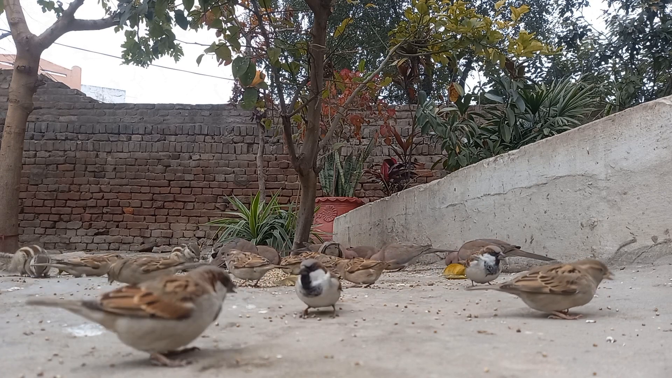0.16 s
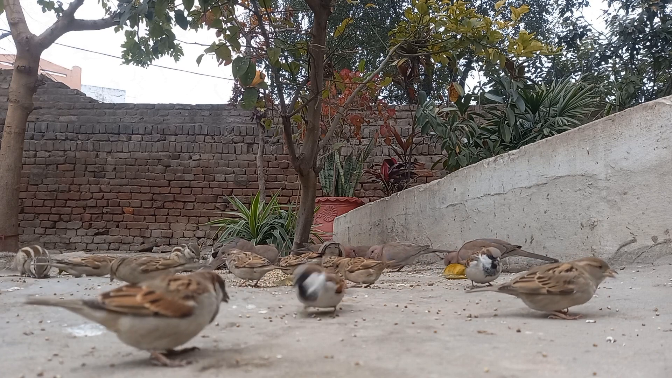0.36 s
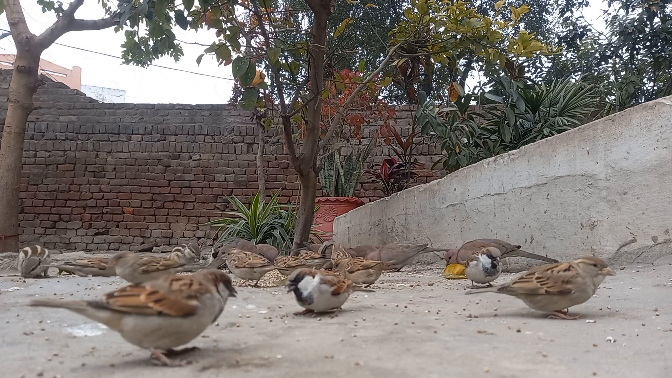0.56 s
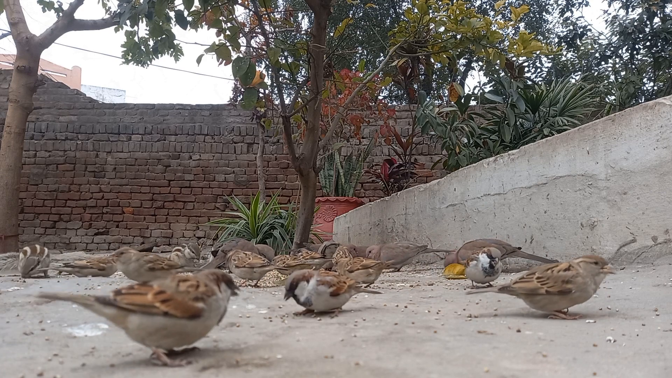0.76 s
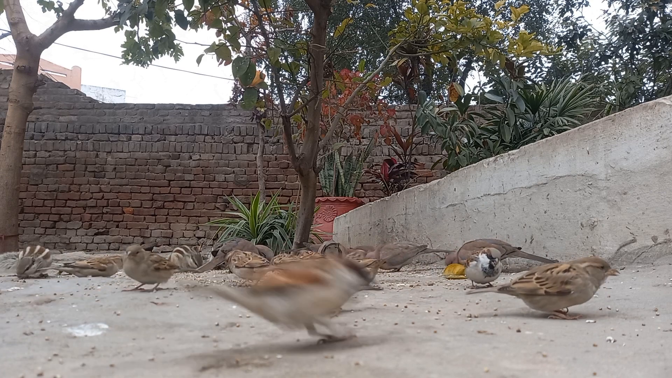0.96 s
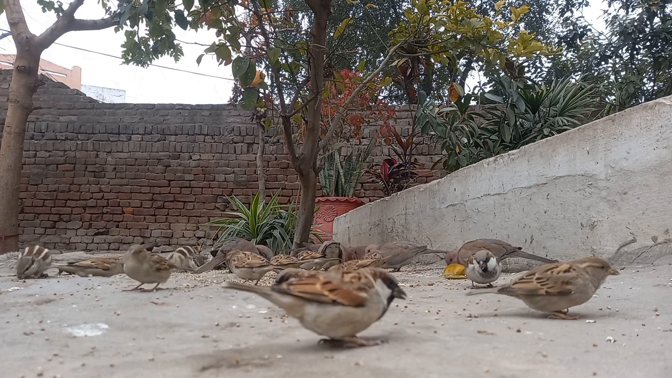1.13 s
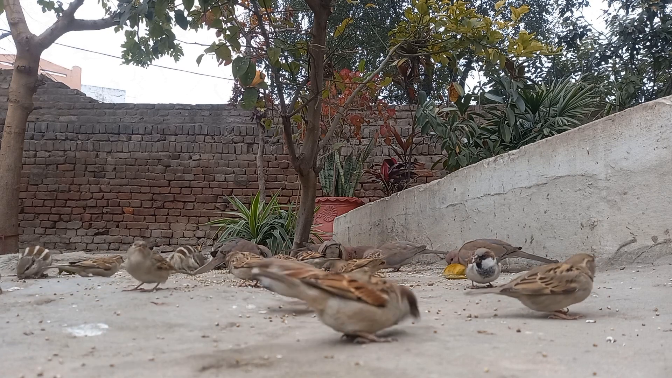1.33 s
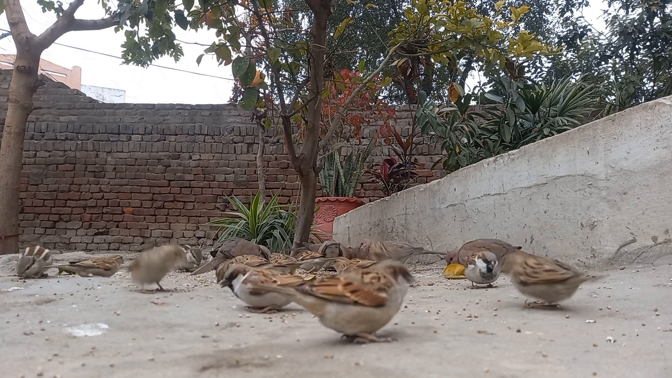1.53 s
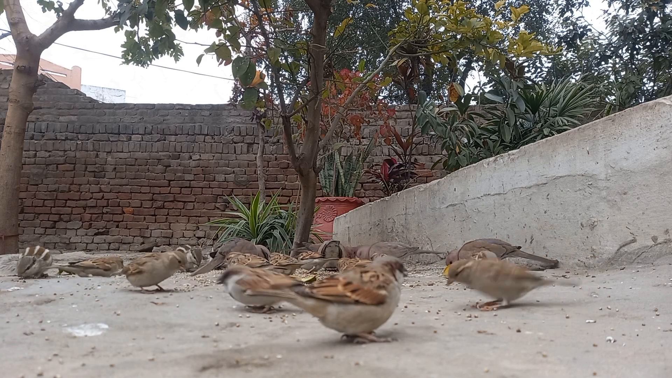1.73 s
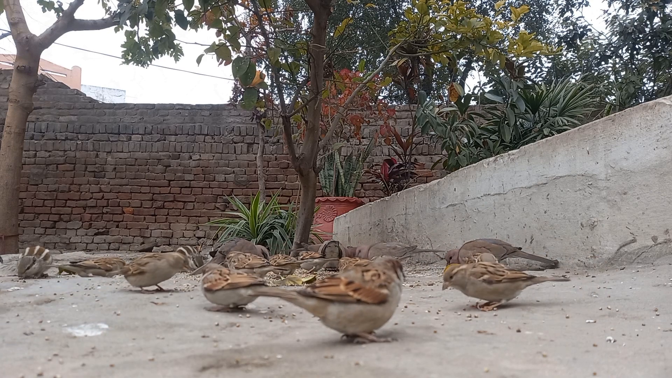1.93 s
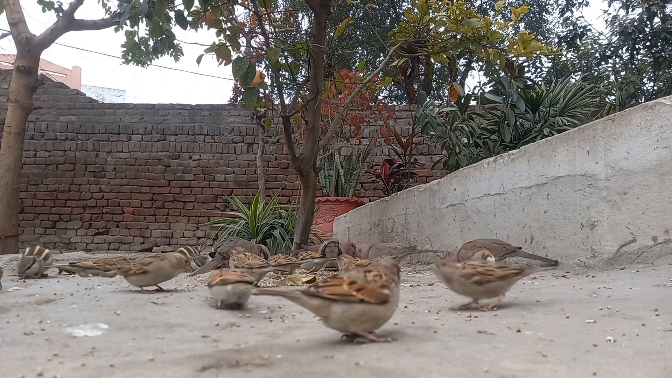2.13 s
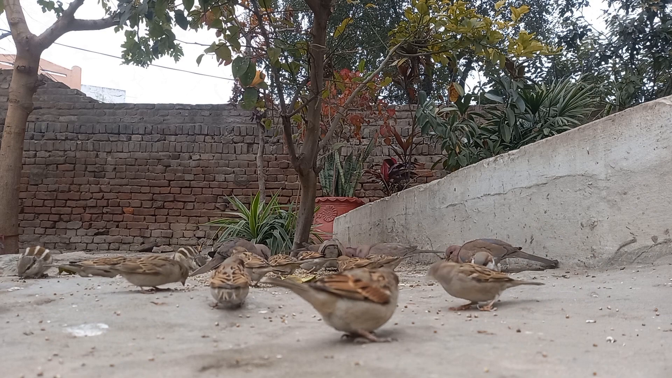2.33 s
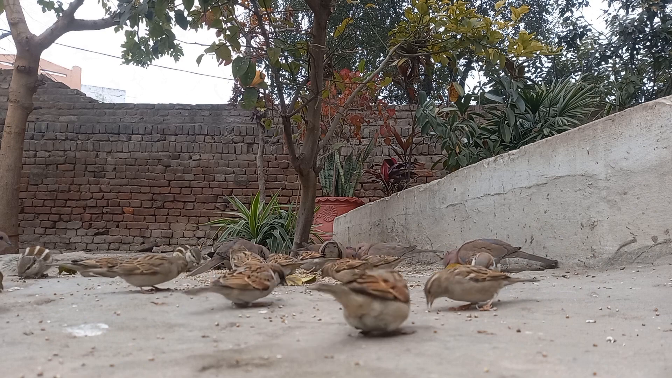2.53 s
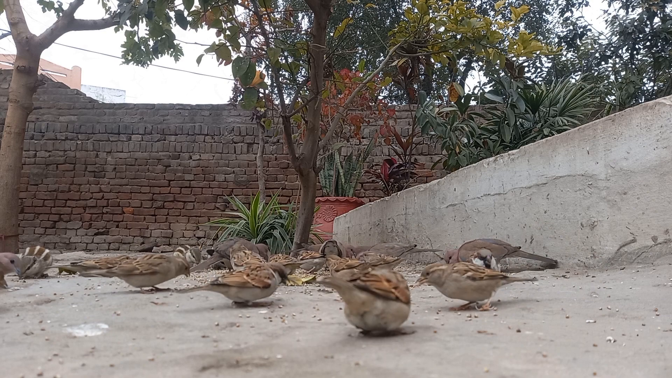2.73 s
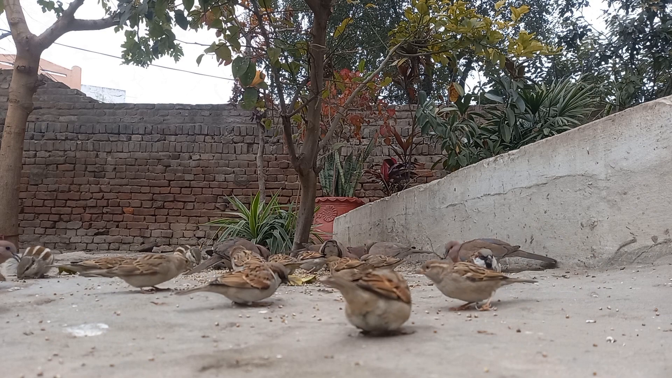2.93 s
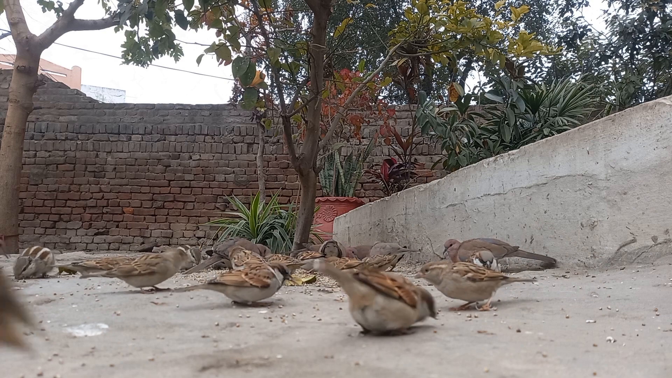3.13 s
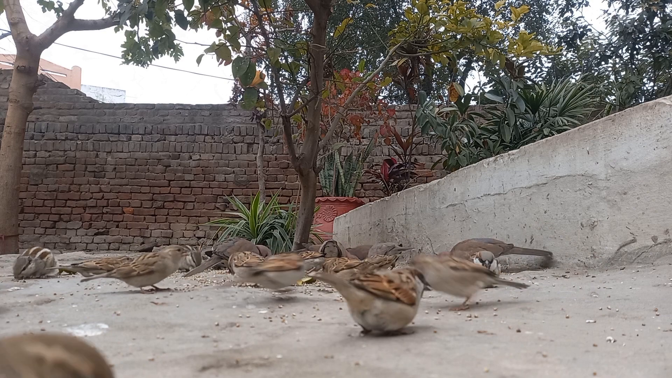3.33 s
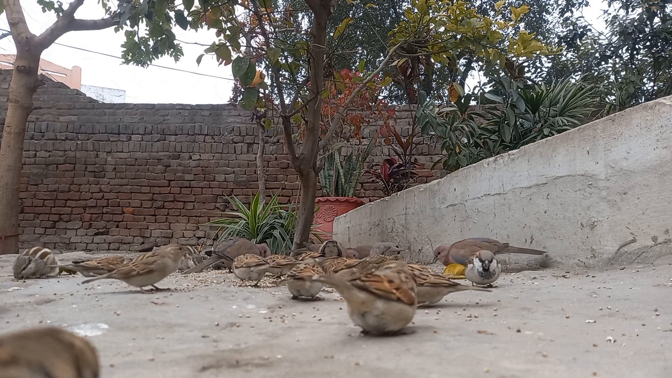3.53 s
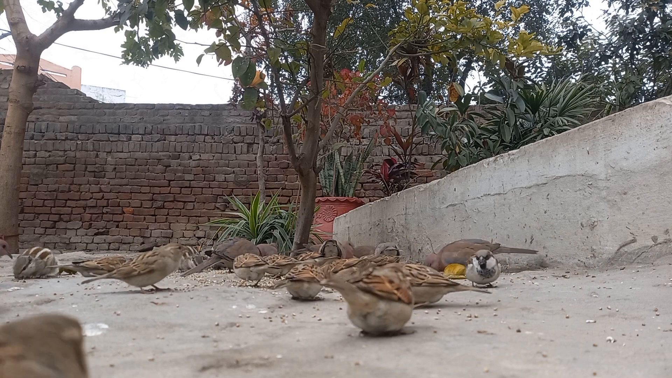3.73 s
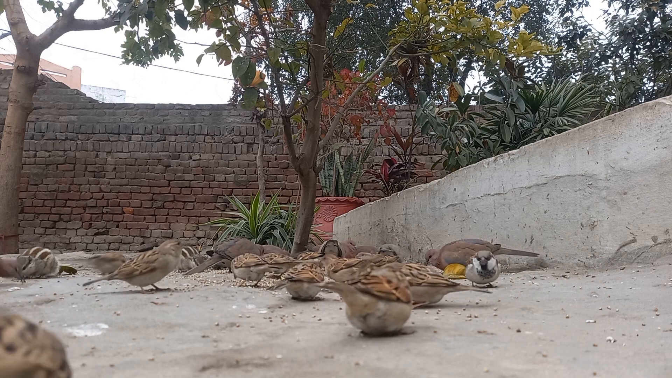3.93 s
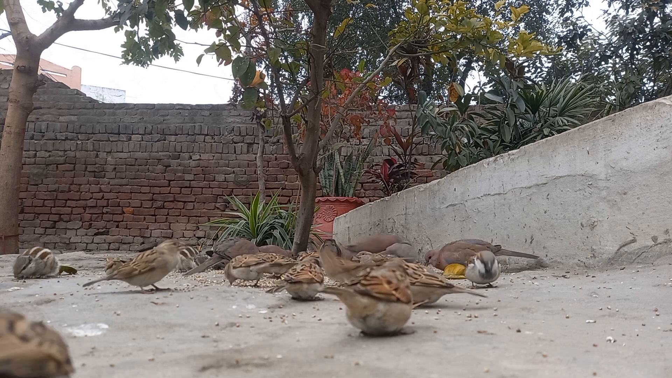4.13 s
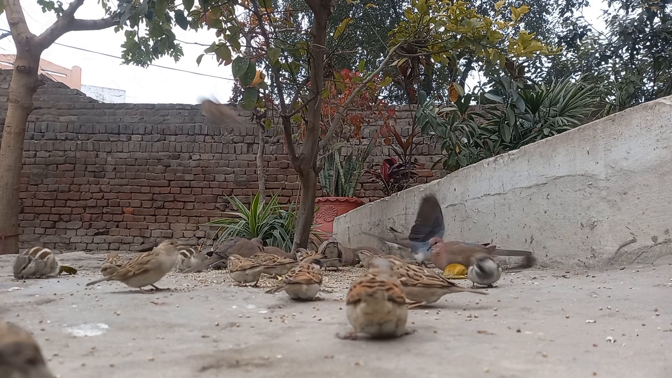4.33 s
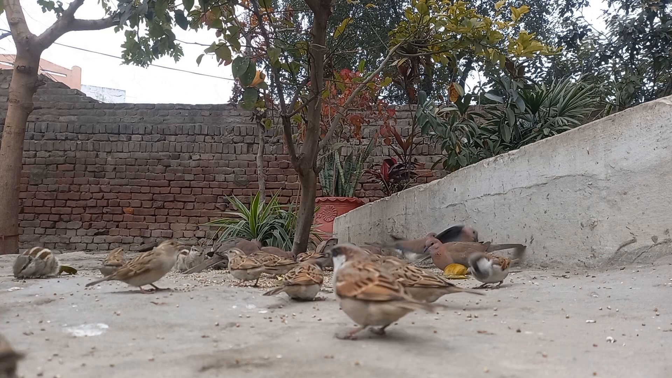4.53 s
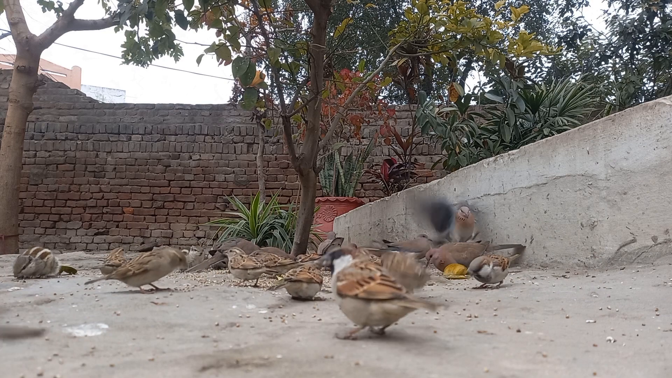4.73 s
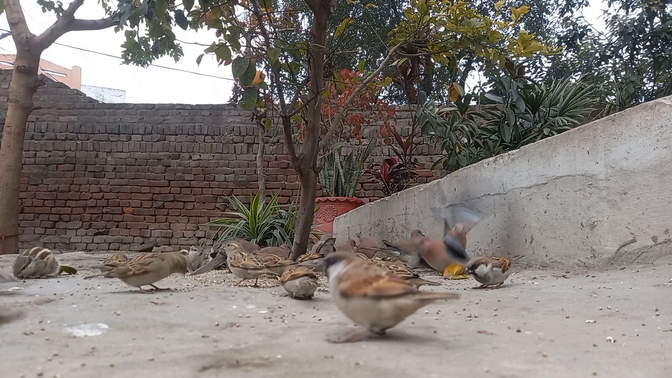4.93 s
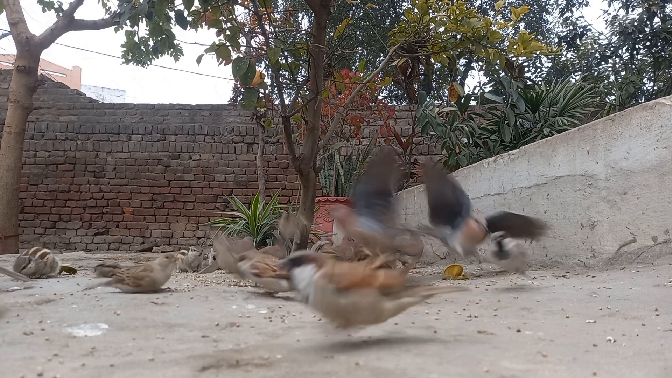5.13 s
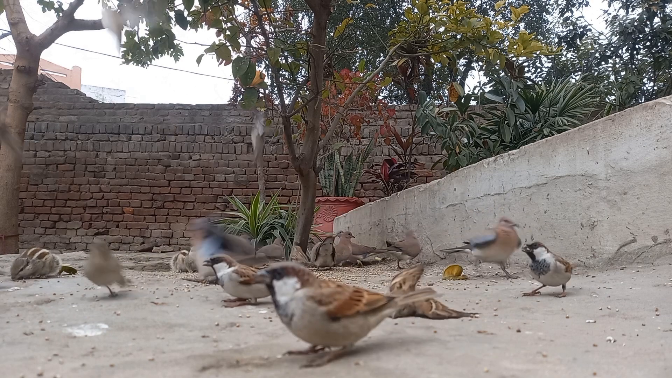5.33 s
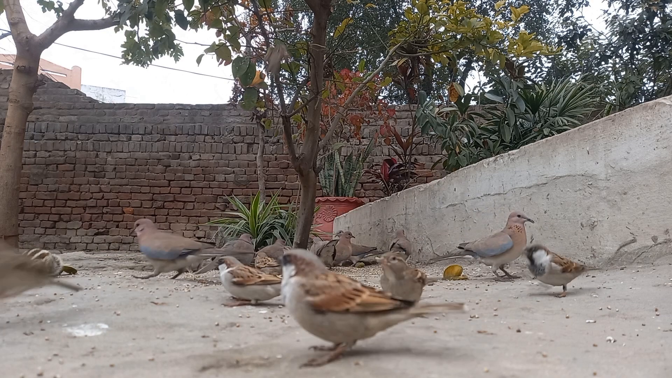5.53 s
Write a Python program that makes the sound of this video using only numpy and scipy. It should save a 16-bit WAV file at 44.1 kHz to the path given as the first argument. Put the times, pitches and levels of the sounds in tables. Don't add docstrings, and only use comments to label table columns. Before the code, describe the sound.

Sparrows peck sharply at seed on concrete with a few chirps and rasping calls, then loud wingbeats drum as birds take off twice.

```python
import sys
import numpy as np
from scipy import signal
from scipy.fft import rfft, irfft, next_fast_len
from scipy.io import wavfile
from scipy.ndimage import uniform_filter1d

SR = 44100
rng = np.random.default_rng(int(sys.argv[2]) if len(sys.argv) > 2 else 0)


def gain_from_decibels(decibels):
    exponent = np.asarray(decibels, float) / 20
    return 10 ** exponent


def unload_wav(signal):
    wavfile.write(
        sys.argv[1],
        SR,
        np.round(np.clip(np.atleast_2d(signal).T, -1, 1) * 32767).astype(np.int16),
    )


N = 249606

# [freq_hz, density_db_per_hz]
AIR_SPECTRUM = [(18, -43.5), (30, -8.5), (96, 0), (302, -13), (634, -13.5), (1020, -15), (3200, -18.5),
                (4400, -28), (6050, -6.5), (6720, -24.5), (7280, -51), (12100, -41.5), (13800, -67.5),
                (15300, -15.5), (17000, -62.5)]
# [time_s, level_db]
AIR_LEVEL = [(0, -58.5), (.09, -64), (0.105, -50.5), (.45, -62.5), (.8, -53.5), (1.2, -59.5), (2.2, -56),
             (3.5, -63), (4.0, -62), (5.66, -50)]
# [freq_hz, likeness_0_to_1]
AIR_LIKENESS = [(60, 0.72), (240, 0.68), (950, 0.026), (3770, 0.011), (15000, 0.044)]
# [freq_hz, left_minus_right_db]
AIR_BALANCE = [(60, 3.5), (240, -1), (950, -1.5), (3770, 18), (15000, 1.5)]
# [freq_hz, gain_db]
MIC_RESPONSE = [(35, -44.5), (62, -4.5), (6300, 3), (6800, -7.5), (7150, -19), (8000, -34.5), (13800, -45),
                (14700, -7.5), (15900, -12), (16300, -29.5), (17300, -58.5)]
# [freq_hz, t60_s]
YARD_DECAY = [(200, 0.35), (1500, 0.31), (3500, 0.33), (7000, 0.028), (16000, 0.074)]
# [start_s, length_s, level_db]
GUSTS = [
    (.1, 0.48, -37.5),
    (.74, 0.42, -45.5),
]
# [freq_hz, density_db_per_hz]
GUST_SPECTRUM = [(71, -45.5), (220, -5.5), (610, -6.5), (684, -13), (828, 2.5), (1310, -20.5),
                 (1890, -16.5), (2500, -26), (3250, -39), (5500, -120)]
# [start_s, length_s, level_db]
SWISHES = [
    (2.46, 0.79, -41.5),
    (3.22, 0.6, -39),
]
# [freq_hz, density_db_per_hz]
SWISH_SPECTRUM = [(530, -67), (900, -35), (1640, -4), (1920, -10), (2110, 1.5), (3040, 2.5), (3650, 1.5),
                  (4370, -15.5), (6050, -5.5), (7000, -23), (9100, -81), (15400, -120)]
# [start_s, length_s, level_db]
THUMPS = [
    (.2, 0.27, -49.5),
    (1.82, 0.23, -42.5),
    (2.26, 0.12, -52.5),
    (3.46, 0.22, -45.5),
]
# [start_s, length_s, first_hz, last_hz, level_db]
COOS = [(.49, .2, 830, 740, -58), (.8, .19, 730, 760, -50), (.72, .31, 628, 637, -50),
        (1.045, .065, 610, 600, -53), (1.13, .1, 610, 595, -54), (.86, .1, 5500, 5400, -56),
        (.88, .12, 2150, 2000, -58), (1.3, .2, 600, 590, -60), (3.94, .11, 660, 688, -63),
        (2.72, .14, 398, 408, -56), (2.92, .06, 410, 400, -60), (.7, .1, 380, 380, -58),
        (3.68, .28, 375, 400, -58), (0, .06, 590, 590, -64), (0, .04, 900, 900, -66),
        (4.0, .2, 5600, 5580, -66)]
# [start_s, length_s,
# first_hz, last_hz, level_db]
LINGERING = [(.18, .37, 1970, 1841, -54), (2.23, 0.42, 3780, 3530, -54), (1.47, 0.3, 2960, 2880, -55),
             (1.56, .13, 4650, 4300, -47), (2.01, .05, 2120, 2150, -59.5), (.1, .06, 1650, 1550, -53)]
# [start_s, length_s, first_hz, last_hz, level_db]
RASPS = [
    (.76, 0.074, 1343, 1496, -45.5),
    (.87, 0.17, 1613, 1458, -44.5),
    (1.49, 0.197, 1414, 1398, -43),
]
RASP_OVERTONES = [-2, -8, -16, -13]
# [start_s, length_s, first_hz, last_hz, level_db]
SCOLDS = [
    (1.555, 0.14, 4500, 3900, -42),
    (1.555, 0.26, 3600, 4300, -47.5),
    (1.72, .14, 6600, 3500, -53),
    (1.5, 0.26, 5750, 5600, -46),
    (1.52, 0.145, 2200, 2300, -52.5),
    (0.8, 0.16, 2500, 1600, -55),
    (.15, 0.1, 2750, 2050, -47),
]
# [time_s, pitch_hz, level_db]
CHIRPS = [
    [(.125, 6450, -46), (.145, 5700, -39.5), (.17, 4430, -61)],
    [(.118, 3290, -52), (.14, 2963, -39), (.165, 2455, -63), (.18, 2010, -43)],
    [(1.325, 2800, -54), (1.334, 4220, -44.5), (1.344, 4330, -54)],
    [(1.35, 4800, -48), (1.364, 4480, -48), (1.378, 3820, -37), (1.395, 3430, -30), (1.412, 3040, -32.5),
     (1.425, 2980, -50), (1.47, 2950, -42)],
]
CHIRP_OVERTONES = [0, -23]
# [time_s, pitch_hz, level_db]
SQUEAL = [(2.062, 850, -46), (2.078, 955, -43), (2.097, 1080, -43), (2.135, 1142, -33), (2.16, 1120, -36),
          (2.19, 1175, -36), (2.225, 1250, -43), (2.3, 1225, -47), (2.44, 1203, -59)]
SQUEAL_OVERTONES = [2, -7, -10, -10, -20, -18]
# [start_s, peak_db, ring_hz]
FAINT_PECKS = [(.112, -41, 5600), (.126, -40, 4650), (.384, -54, 4600), (.54, -44, 3900),
               (1.503, -27, 3440), (1.768, -28.5, 5640), (2.275, -32.5, 5500), (2.56, -42, 4600),
               (2.9618, -31, 5850), (3.031, -30, 4390), (3.062, -31, 6060), (3.072, -30, 5900),
               (3.082, -36, 5800), (3.1224, -32.5, 5840), (3.1429, -34, 4530), (3.1938, -42, 5970),
               (3.2062, -35, 6110), (3.2347, -28, 3870), (3.4272, -31, 4160), (3.661, -25.5, 6100),
               (3.9191, -45, 4300), (3.9316, -38, 3000), (4.0049, -46, 5520), (4.0309, -42, 5640),
               (4.0563, -37, 5000), (4.0882, -41, 5590), (4.095, -43, 4400), (4.1426, -40, 5800),
               (4.195, -41, 5860), (4.2384, -41, 5760), (4.7268, -39, 5990), (4.7597, -26, 6220),
               (.614, -32.5, 4900), (.6491, -26.5, 5000), (1.228, -45, 4200), (1.288, -41, 5870)]
# [start_s, peak_db]
TAPS = [(0.192, -38), (1.402, -31), (1.469, -29), (1.743, -33), (1.757, -29), (1.936, -31.5), (2.33, -35),
        (2.4936, -36), (2.542, -28.5), (2.916, -31), (3.024, -30.5), (3.661, -33.5)]
# [start_s, peak_db]
TICKS = [(0.101, -29), (0.2794, -32), (0.353, -27.5), (.53, -34.5), (0.589, -42), (0.74, -31), (.8719, -37),
         (1.005, -32), (1.0927, -29), (1.2492, -36.5), (1.8162, -25), (2.002, -37), (2.044, -39),
         (2.2308, -30.5), (2.239, -30), (2.2466, -34), (2.616, -30), (2.6486, -22), (3.768, -30),
         (3.947, -32.5), (4.153, -33)]
# [start_s, peak_db]
HUSKS = [(0.17, -42), (0.289, -40), (0.3216, -29.5), (0.3535, -39.5), (1.054, -36.5), (1.511, -31),
         (1.685, -23), (1.915, -24), (2.446, -36), (2.5417, -28), (2.9173, -27.5), (3.245, -27.5),
         (4.48, -37)]
# [start_s, peak_db, ring_hz]
PECKS = [(.17, -15.5, 6020), (.2498, -22, 5900), (.2899, -17, 6040), (.319, -21, 6300), (.402, -21.5, 6640),
         (.6321, -21.5, 5120), (.6617, -22, 6900), (.7443, -10.5, 5200), (.7981, -17, 5540),
         (.9192, -19.5, 6200), (.9732, -25.5, 4230), (1.0535, -21, 5500), (1.1914, -24, 6200),
         (1.3045, -21.5, 5800), (1.389, -24, 5360), (1.512, -21, 5700), (1.643, -18.5, 5000),
         (1.68, -19.5, 4500), (1.688, -12.5, 4970), (1.903, -20, 6500), (1.9155, -21.5, 3520),
         (2.0174, -23, 5650), (2.447, -16.5, 6230), (2.4618, -27.5, 6010), (2.819, -27.5, 4050),
         (2.8744, -15, 6340), (2.8822, -29, 3500), (3.2405, -25.5, 3760), (3.2457, -24, 4500)]
# [start_s, peak_db, ring_hz, ring_cycles]
KNOCKS = [(1.198, -38.5, 1050, 1.5), (1.688, -24, 2600, 2.6), (1.916, -24, 2110, 5.9),
          (2.010, -42.5, 1240, 14), (2.308, -36, 1630, 2.6), (2.328, -27.5, 1410, 1.5),
          (2.451, -23, 860, 5.1), (2.881, -24, 2400, 3.1), (3.235, -42, 1450, 4), (3.236, -47, 393, 3.8),
          (3.245, -31, 1920, 2.9), (3.246, -47, 920, 9.9), (4.251, -40, 2050, 8.7), (4.271, -30, 700, 6.4),
          (4.316, -26.5, 2300, 2.6), (4.319, -18.5, 830, 6.2), (4.398, -21.5, 615, 4.4),
          (4.647, -41, 990, 2.8), (4.781, -22, 1280, 6.1), (4.782, -23.5, 550, 5.3),
          (4.852, -23.5, 950, 6.8), (4.852, -19.5, 250, 3.3), (1.846, -40.5, 1900, 2.5),
          (1.903, -37, 1250, 3.5), (4.853, -28, 2230, 9), (4.860, -27, 1630, 8.3),
          (4.876, -21.5, 1520, 6.6), (4.921, -13.5, 428, 10), (4.952, -20.5, 433, 6.4),
          (4.986, -25.5, 450, 5.3), (5.004, -22, 467, 5.5), (5.026, -24, 1280, 5.6),
          (5.049, -23.5, 1500, 3.8), (5.035, -31, 420, 12.5), (.101, -41.5, 1200, 1.8),
          (.121, -48, 1010, 3.6), (5.110, -8, 1180, 4.3), (5.111, -11, 317, 3), (5.128, -23, 1100, 4.7),
          (5.1378, -5, 240, 1.5), (5.131, -14.5, 3000, 3), (5.437, -20.5, 646, 2), (5.141, -15, 990, 3.7),
          (5.203, -13, 1040, 2.6), (5.215, -23, 686, 15), (5.246, -25, 1040, 5), (5.271, -14, 715, 1.9),
          (5.311, -7, 547, 2.4), (5.329, -12, 1360, 0.97), (5.353, -24, 505, 6.4)]
# [freq_hz, width_hz, level_db]
YARD_RESONANCES = [
    (71.8, 6.3, 3),
    (93.6, 52, 6.5),
    (117, 12, 2.5),
    (228, 25, -10.5),
]
# [time_s, level_db]
LIFT = [
    [(4.24, -55.5), (4.3, -19), (4.45, -20), (4.6, -23), (4.86, -29), (5.0, -33.5)],
    [(5.11, -37), (5.145, -15.5), (5.22, -23), (5.3, -18.5), (5.4, -16.5), (5.7, -24)],
]
# [pitch_hz, cycles, over_lift_db]
PUSH = (98, 5.5, 2.0)
# [start_s, strokes_per_s, stroke_levels_db]
TAKEOFFS = [
    (4.271, 23.05, [-28.5, -14.5, -18, -17, -23.5, -18, -20, -27.5, -25, -29, -36, -37]),
    (5.134, 23.05, [-13, -36, -22.5, -16.5, -11.5, -14, -13, -15, -17, -21.5, -24, -31.5, -25.5]),
]
# [start_s, peak_db]
FLAPS = [
    (4.851, -24.5),
    (5.045, -27),
    (5.124, -20),
]
# [time_s, level_db]
FLURRY = [(4.23, -55.5), (4.28, -36), (4.45, -39.5), (4.58, -49.5), (4.843, -38), (4.856, -29),
          (4.93, -36.5), (5.0, -29), (5.07, -33.5), (5.145, -25.5), (5.22, -31), (5.47, -34), (5.56, -38),
          (5.7, -41.5)]
# [freq_hz, density_db_per_hz]
STROKE_SPECTRUM = [(88, -11.5), (150, 1), (894, -14.5), (1400, -16), (2380, -23.5), (4050, -37),
                   (5870, -28.5), (7000, -31), (9100, -82.5), (15400, -120)]
# [freq_hz, likeness_0_to_1]
WING_LIKENESS = [(60, 0.72), (240, 0.79), (950, 0), (3770, 0.065), (15000, 0.079)]
# [start_s, level_db, length_s]
PUFFS = [(4.33, -68, 0.034), (4.478, -74, .0066), (4.785, -62, 0.019), (4.85, -52.5, 0.015),
         (5.007, -58, 0.011), (5.026, -62, 0.03), (5.078, -64, .012), (5.108, -56, .008),
         (5.125, -46, 0.015), (5.2, -63.5, .03), (5.28, -67, 0.033), (5.37, -58, 0.008),
         (5.388, -60.5, .012), (5.49, -69, .01), (5.656, -52, 0.011)]
# [start_s, peak_db, ring_hz]
SNAPS = [(4.2636, -28, 2180), (4.3146, -25, 2410), (4.6468, -23.5, 4000), (5.009, -8, 5100),
         (5.026, -12, 4130), (5.0783, -13, 4460), (5.1277, -14.5, 2180), (5.1384, -7.5, 4470),
         (5.203, -15, 2310), (5.3293, -8, 4630), (4.248, -40, 2020), (5.09, -14, 5540), (5.2611, -22, 3570),
         (5.344, -21, 2020), (5.4821, -25, 2790), (5.5733, -20, 5800), (5.6362, -35, 5870),
         (5.4037, -27, 2550), (5.4521, -14.5, 6030), (5.5486, -17.5, 5750)]


def evened(x):
    return x / np.sqrt(np.mean(x ** 2) + 1e-20)


def smoothed(x, size):
    return uniform_filter1d(uniform_filter1d(x, size), size)


def read(points, hz):
    f, value = np.transpose(points)
    return np.interp(np.log(hz + 1), np.log(f + 1), value)


def add(mix, start_s, sound):
    part = mix[..., round(start_s * SR):][..., :sound.shape[-1]]
    part += sound[..., :part.shape[-1]]


def level(tables):
    out = np.zeros(N)
    for rows in tables:
        s, db = np.transpose(rows)
        t = np.arange(s[0], s[-1], 1 / SR)
        add(out, s[0], gain_from_decibels(np.interp(t, s, db)) * signal.windows.tukey(len(t), .04))
    return out


def arches(events, top, rise_db, fall_db):
    u, top = np.linspace(0, 1, num=17), np.clip(top, .02, .98)
    rise = rise_db * (1 - u / top) ** 2
    fall = fall_db * ((u - top) / (1 - top)) ** 2
    arch_db = np.where(u < top, rise, fall)
    curves = []
    for start_s, length_s, *glide_hz, db in events:
        columns = [start_s + length_s * u]
        if glide_hz:
            columns.append(np.interp(u, [0, 1], glide_hz))
        curves.append(np.column_stack(columns + [db + arch_db]))
    return curves


def bursts(events):
    out = np.zeros(N)
    for start_s, db, length_s in events:
        u = np.arange(0, 5, 1 / (SR * max(length_s, .004)))
        add(out, start_s, gain_from_decibels(db) * np.minimum(4 * u, 1) * np.exp(-u))
    return out


def noise(spectrum, patchy_db, likeness, left_db, size=512):
    frames, hz = 4 * N // size + 5, np.fft.rfftfreq(size, 1 / SR)
    a, b, c, d, patches = rng.standard_normal((frames, len(hz), 5)).T
    patches = uniform_filter1d(patches, size=size // 80, axis=0)
    patches = evened(uniform_filter1d(patches, size=8192 // size, axis=1))
    same = np.clip(read(likeness, hz), -1, 1)[:, None]
    left, other = a + 1j * b, c + 1j * d
    z = np.array([left, same * left + np.sqrt(1 - same ** 2) * other])
    steadier_bass = np.clip(hz / 500, .3, 1)[:, None]
    z *= gain_from_decibels(read(spectrum, hz)[:, None] + patchy_db * patches * steadier_bass)
    z *= gain_from_decibels(np.outer([.5, -.5], read(left_db, hz)))[:, :, None]
    out = signal.istft(z, nperseg=size, noverlap=3 * size // 4)[1][:, :N]
    return out / np.sqrt(np.mean(out.mean(0) ** 2))


def ring(hz, cycles, rise=0):
    u = np.arange(0, 3 * cycles / hz, 1 / SR) * hz / cycles
    swell = (4 * u * np.exp(1 - 4 * u)) ** 2
    return np.sin(2 * np.pi * cycles * (u + rise * u ** 2)) * swell


def random_rings(size, pitches_hz, cycles, rise=0):
    kind = rng.integers(0, len(pitches_hz), N)
    return [signal.oaconvolve(size * (kind == k), ring(hz, cycles, rise))[:N]
            for k, hz in enumerate(pitches_hz)]


def clicks(events, cycles=3.24):
    out = np.zeros(N)
    rattle = np.exp(-np.arange(300) / (.0026 * SR))
    for start_s, db, hz in events:
        a, b, c = rng.random(3)
        grit = rng.standard_normal(300)
        tap = np.zeros(500)
        add(tap, .0005, ring(hz, cycles * (1 + 0.85 * a)))
        add(tap, .0005, gain_from_decibels(-23 + 13 * b) * ring((.4 + .3 * a) * hz, 2.6))
        add(tap, .001, gain_from_decibels(-18.0) * ring(15300, 17.5))
        add(tap, .0013 + .002 * c, gain_from_decibels(-9) * tap.copy())
        add(tap, .0006, gain_from_decibels(-26) * np.convolve(tap, grit * rattle))
        add(out, start_s, gain_from_decibels(db) * tap)
    return out


def notes(tables, tones_db, wobble, rough, size, dulling=0):
    out = np.zeros(N)
    share = np.clip(rough, 0, 1)
    for rows in tables:
        s, hz, db = np.transpose(rows)
        t = np.arange(s[0], s[-1], 1 / SR)
        shake, *grit = [evened(smoothed(v, size)) for v in rng.standard_normal((len(t), 7)).T]
        turns = np.cumsum(np.interp(t, s, hz) * (1 + wobble * shake)) / SR
        effort_db = np.interp(t, s, db)
        fade_db = dulling * (effort_db - max(db)) * (t > s[np.argmax(db)])
        tone = np.zeros(len(t))
        for k, tone_db in enumerate(tones_db):
            line = np.cos(2 * np.pi * (k + 1) * turns) * (1 - share + share * grit[k])
            tone += gain_from_decibels(tone_db + fade_db * (k > 0)) * line
        add(out, s[0], np.sqrt(2) * tone * gain_from_decibels(effort_db) * signal.windows.tukey(len(t), .1))
    return out


def steady_air():
    s, db = np.transpose(AIR_LEVEL)
    gain = gain_from_decibels(3.0 + np.interp(np.arange(N) / SR, s, db))
    air = gain * noise(AIR_SPECTRUM, 5.2, AIR_LIKENESS, AIR_BALANCE, size=1024)
    return signal.sosfilt(signal.butter(4, 60, "high", fs=SR, output="sos"), air)


def yard(x):
    taps = np.zeros((2, SR))
    at = np.arange(300, SR - 20, 20) + rng.integers(0, 20, (2, (SR - 301) // 20))
    np.put_along_axis(taps, at, rng.choice([-1., 1.], at.shape), 1)
    hz, t, z = signal.stft(taps, SR, nperseg=256)
    t60_s = np.maximum(read(YARD_DECAY, hz), .03)[:, None]
    tail = signal.istft(z * gain_from_decibels(-60 * t / t60_s), SR, nperseg=256)[1]
    return signal.fftconvolve(x[None], tail / np.linalg.norm(tail[0]), axes=1)[:, :N]


def wind():
    gust = noise(GUST_SPECTRUM, 2.6, AIR_LIKENESS, AIR_BALANCE)
    swish = noise(SWISH_SPECTRUM, 2.2, AIR_LIKENESS, [(1000, 0.5), (6000, 4.6)])
    swish_gain = level(arches(SWISHES, 0.5, rise_db=-18, fall_db=-39.5))
    gust_gain = level(arches(GUSTS, 0.38, rise_db=-61, fall_db=-49.0))
    return swish * swish_gain + gust * gust_gain


def far_birds():
    calls = arches(LINGERING, .1, rise_db=-4, fall_db=-13) + arches(COOS, .45, rise_db=-11, fall_db=-14)
    far = notes(calls, [0], wobble=.007, rough=.6, size=480)
    rasp_curves = arches(RASPS, 0.67, rise_db=-19.5, fall_db=-34.0)
    rasps = notes(rasp_curves, RASP_OVERTONES, wobble=0.02, rough=0.67, size=170)
    scold_curves = arches(SCOLDS, 0.14, rise_db=-1.0, fall_db=-16.5)
    scolds = notes(scold_curves, [0], wobble=0.0402, rough=0.76, size=45)
    return far + rasps + scolds


def chirping():
    return notes(CHIRPS, CHIRP_OVERTONES, wobble=.002, rough=.06, size=60, dulling=.4)


def squealing():
    return notes([SQUEAL], SQUEAL_OVERTONES, wobble=.004, rough=.35, size=260, dulling=.35)


def patter():
    size = gain_from_decibels(-56 + 4.5 * np.minimum(rng.exponential(1, N), 3)) * (rng.random(N) < 45 / SR)
    return sum(random_rings(size, [4500, 5300, 5900, 6600], 3))


def pecks():
    tick_hz, tap_hz = 5700, 3900
    light = [(s, db, tick_hz) for s, db in TICKS] + [(s, db, tap_hz) for s, db in TAPS]
    out = clicks(PECKS) + clicks(light) + clicks(FAINT_PECKS) + patter()
    for start_s, db in HUSKS:
        add(out, start_s + .001, gain_from_decibels(db + 21) * ring(15300, 7))
        add(out, start_s + 0.0017, gain_from_decibels(db + 25.5) * ring(11000, 5.0))
    return out


def knocks():
    out = np.zeros(N)
    for start_s, db, hz, cycles in KNOCKS:
        add(out, start_s, gain_from_decibels(db) * ring(hz, max(cycles, 1.5)))
    return out


def drumming():
    size = next_fast_len(N)
    hz = np.fft.rfftfreq(size, 1 / SR)
    shape = sum(gain_from_decibels(db) / (1 + (2 * (hz - f) / width) ** 2) for f, width, db in YARD_RESONANCES)
    body = irfft(rfft(rng.standard_normal(size)) * shape, size)[:N]
    steady = body / np.sqrt(uniform_filter1d(body ** 2, size=1300) + 0.035 * np.mean(body ** 2))
    push_hz, push_cycles, push_db = PUSH
    pushes = np.zeros(N)
    for start_s, rate, strokes_db in TAKEOFFS:
        for k in range(len(strokes_db)):
            push = ring(push_hz * rng.uniform(.85, 1.25), push_cycles)
            add(pushes, start_s + k / rate - .012, gain_from_decibels(push_db) * push)
    loose = gain_from_decibels(-3.0) * steady
    wide = gain_from_decibels(-18.5) * np.outer([1, -1], np.roll(steady, shift=9000))
    thump_gain = level(arches(THUMPS, 0.41, rise_db=-13.5, fall_db=-19.5))
    thump_gain = uniform_filter1d(thump_gain, size=1800) * gain_from_decibels([[2.5], [-4]])
    return (pushes + loose + wide) * level(LIFT) + steady * thump_gain


def flight():
    strokes = FLAPS + [(s + k / rate, db) for s, rate, row in TAKEOFFS for k, db in enumerate(row)]
    whups = np.zeros(N)
    for s, db in strokes:
        low = ring(rng.uniform(175, 215), 3.5, rise=.55)
        add(whups, s - .004, gain_from_decibels(db - 1) * low)
        high_db = db - 6 - 4 * rng.random()
        high = ring(rng.uniform(400, 560), rng.uniform(5, 8), rise=rng.uniform(.1, .45))
        add(whups, s, gain_from_decibels(high_db) * high)
    beats = bursts([(s - .002, db - 15.5, .015) for s, db in strokes])
    whir = level([FLURRY])
    flutter = gain_from_decibels(2.6 * evened(smoothed(rng.standard_normal(N), 350)))

    balance = [(100, .4), (8000, 8.4)]  # freq_hz, left_minus_right_db
    rustle_spectrum = [(1500, -30), (2200, 0), (4200, -3), (6000, 2), (8000, -10)]
    hiss_spectrum = [(6500, -50), (8500, 1.5), (11500, 3.5), (13000, -9.5), (17000, -14)]
    air = noise(STROKE_SPECTRUM, 3.2, WING_LIKENESS, balance, size=256)
    rustle = noise(rustle_spectrum, 3.5, WING_LIKENESS, balance, size=256)
    hiss = noise(hiss_spectrum, 5, WING_LIKENESS, balance, size=256)
    rustle_gain = gain_from_decibels(-2.5) * whir ** 1.315 + gain_from_decibels(-16.5) * beats
    filling = air * (beats + whir * flutter) + rustle * rustle_gain

    slap_size = gain_from_decibels(-3 + 2.5 * np.minimum(rng.exponential(1, N), 3))
    slaps = slap_size * (rng.random(N) < 150 / SR) * (.6 * whir + beats)
    quills = random_rings(slaps, [480, 620, 800, 1100, 1500, 2100], 3.5, rise=.3)
    quill_pair = np.array([sum(quills), sum(quills[:3]) - 0.67 * sum(quills[3:])])
    return whups + quill_pair + filling + gain_from_decibels(41.0) * hiss * bursts(PUFFS)


def scene():
    taps, knock, snaps = pecks(), knocks(), clicks(SNAPS, cycles=2.5)
    chirps, squeal, far = chirping(), squealing(), far_birds()
    direct = np.array([taps, np.roll(taps, shift=11)]) * gain_from_decibels([[5.5], [-10]])
    direct += knock + chirps * gain_from_decibels([[.6], [-.6]])
    direct += np.outer(gain_from_decibels([6, -3]) * [1, -1], squeal)
    direct += np.array([snaps, np.roll(snaps, shift=5)]) * gain_from_decibels([[4], [-4]])
    direct += far * gain_from_decibels([[1.2], [-1.2]])
    sent = gain_from_decibels(-15.0) * taps + gain_from_decibels(-13.5) * (knock + snaps)
    sent += gain_from_decibels(-5.5) * (chirps + squeal) + gain_from_decibels(-1.0) * far
    return direct + yard(sent) + wind() + drumming() + flight()


def low_pass(x):
    return signal.sosfilt(signal.butter(12, 17170, fs=SR, output="sos"), x)


def record(dry):
    size = next_fast_len(N + 4096)
    response = gain_from_decibels(read(MIC_RESPONSE, np.fft.rfftfreq(size, 1 / SR)))
    heard = irfft(rfft(dry, size) * response, size)[:, :N]
    mix = heard + steady_air()
    return low_pass(mix)


dry = scene()
out = record(dry)
unload_wav(out)
```